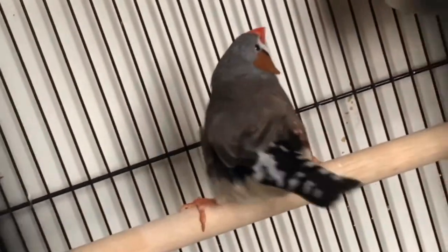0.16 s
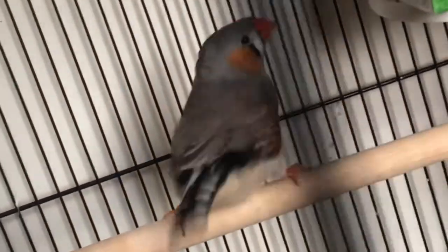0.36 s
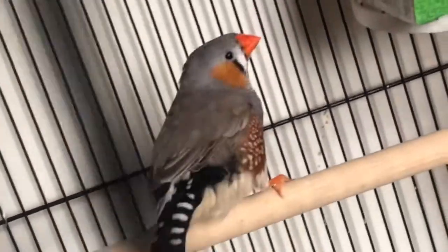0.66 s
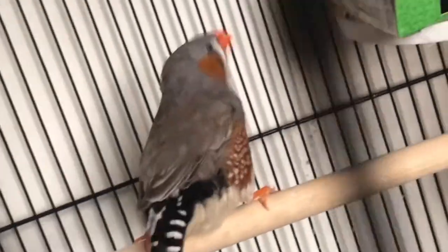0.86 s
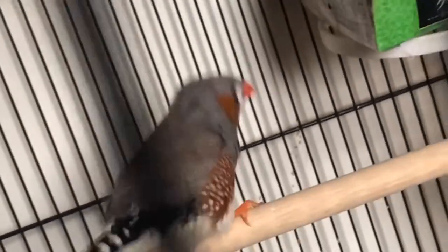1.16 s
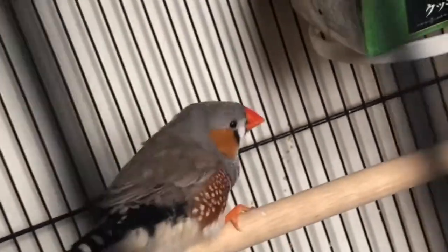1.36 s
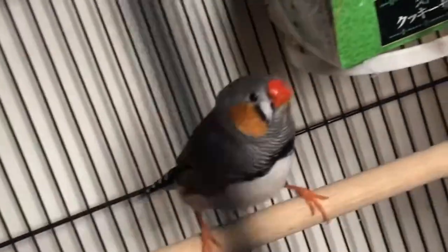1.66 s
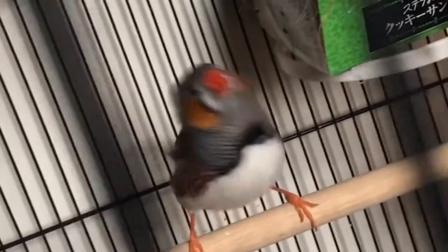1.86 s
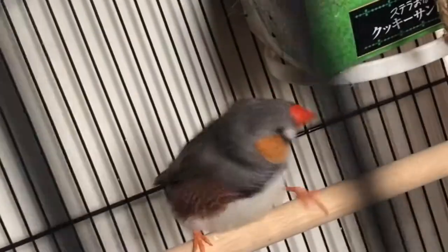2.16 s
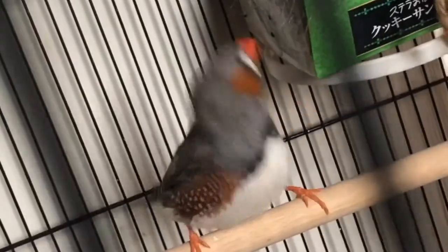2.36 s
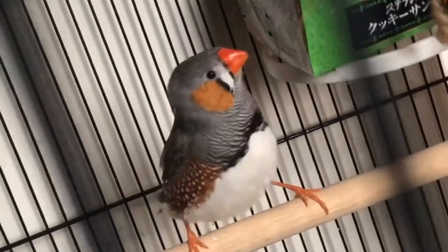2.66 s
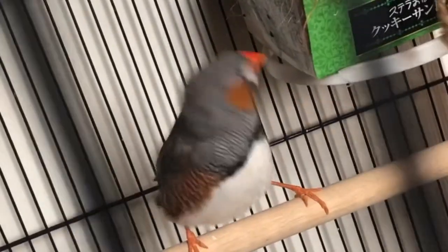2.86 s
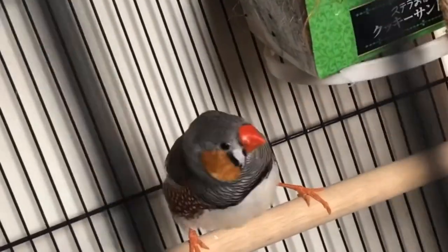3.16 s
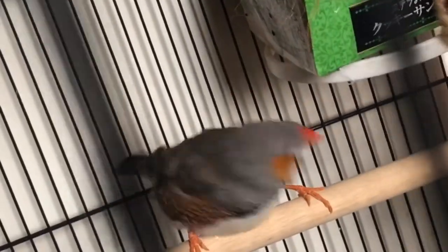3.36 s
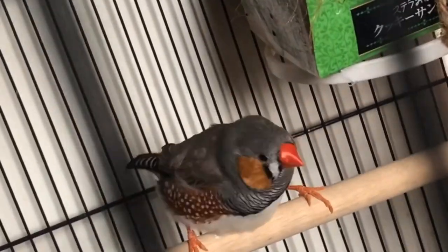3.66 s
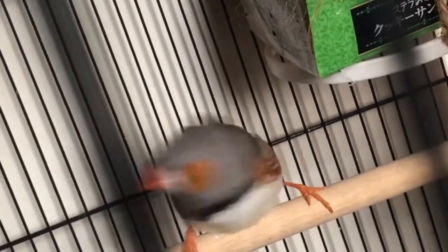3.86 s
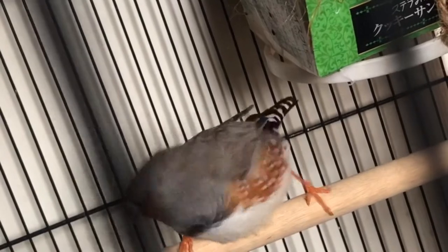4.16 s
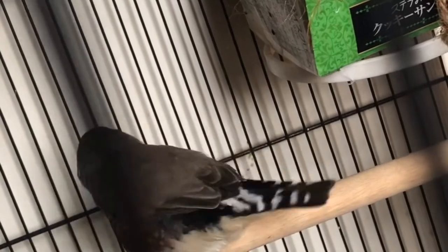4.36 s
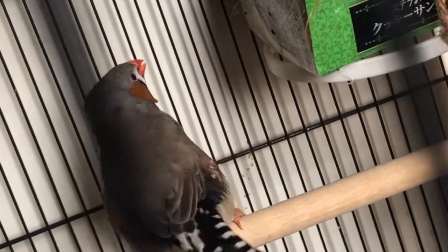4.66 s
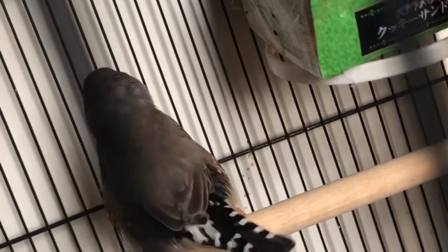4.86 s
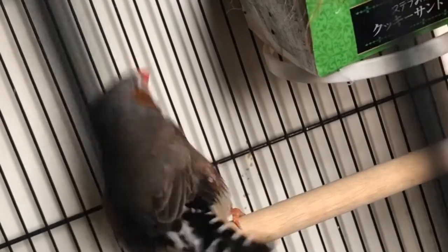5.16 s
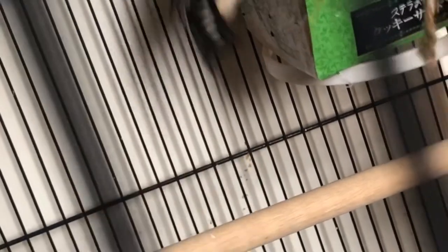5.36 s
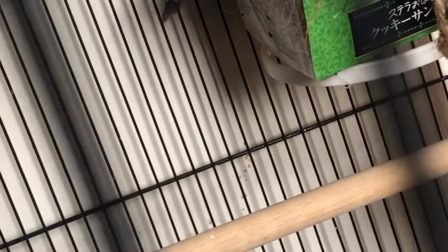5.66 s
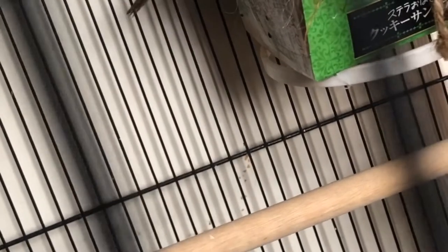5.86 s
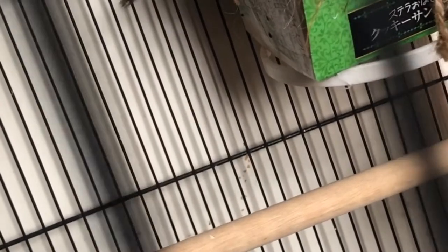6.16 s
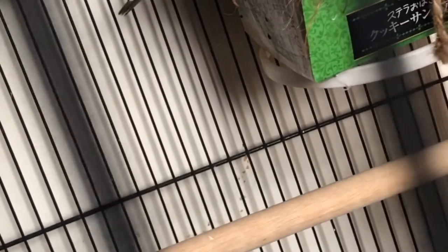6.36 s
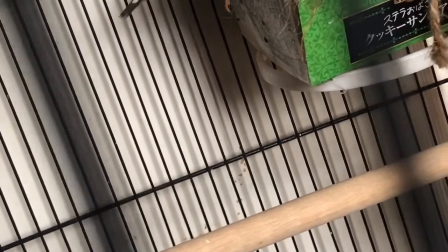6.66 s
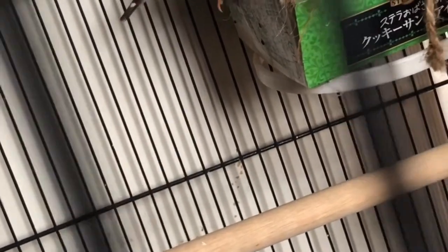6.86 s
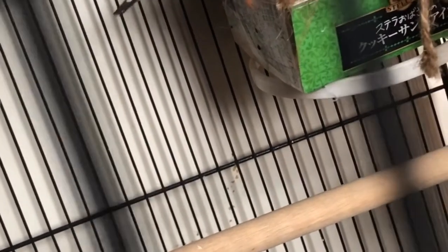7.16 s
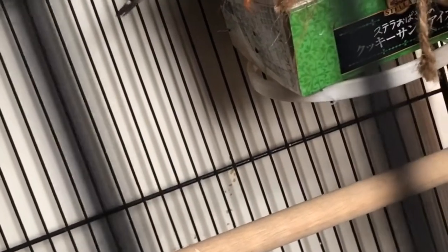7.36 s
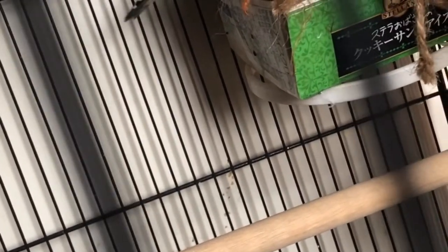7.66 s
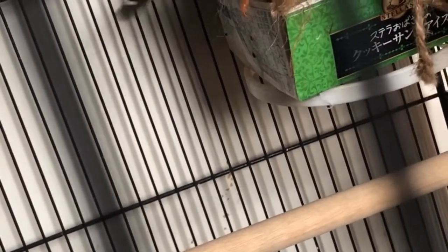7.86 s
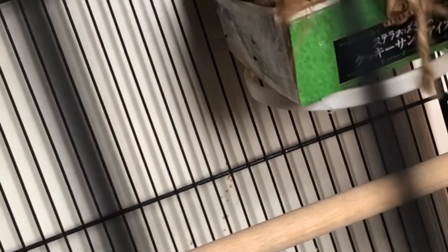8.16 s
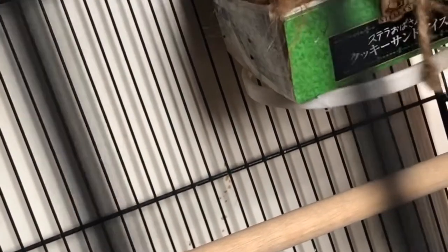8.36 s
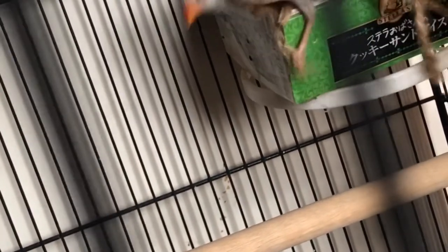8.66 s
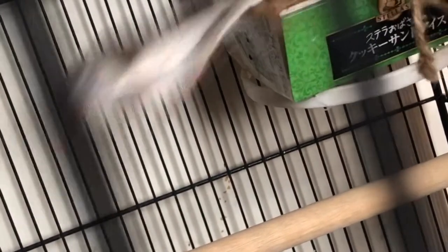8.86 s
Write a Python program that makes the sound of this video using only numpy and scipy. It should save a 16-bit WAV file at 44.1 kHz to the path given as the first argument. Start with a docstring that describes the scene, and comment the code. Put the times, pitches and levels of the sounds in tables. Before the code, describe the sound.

A zebra finch close by sings five quick buzzy, squeaky phrases in a quiet room, with soft nasal calls, perch knocks and wing rustles between.

```python
"""A zebra finch sings in a wire cage in a quiet room, close to the microphone: a syrinx pulsing into a throat.
Soft nasal calls and lead-in notes run into a fixed motif, sung five times; the last two end in a long call,
a whistle and a down-slur. Between bouts the bird hops, with ticks and knocks from the perch, ruffles its
wings in rustling noise and once lands with a thump. Behind it lie low rumble, thin hiss and a faint hum."""
import sys
import numpy as np
from scipy import signal
from scipy.fft import rfft, irfft
from scipy.io import wavfile
from scipy.ndimage import uniform_filter1d

SR = 44100
rng = np.random.default_rng(int(sys.argv[2]) if len(sys.argv) > 2 else 0)


def dump_mix(stems):
    """Bounce the given channels to the path in sys.argv[1] as a 16-bit WAV at rate SR."""
    frames = np.atleast_2d(stems).T  # one column per channel
    limited = np.clip(frames, -1, 1)  # hard clip at full scale
    pcm = np.round(limited * 32767).astype(np.int16)
    wavfile.write(sys.argv[1], SR, pcm)


N = 397782  # samples, about 9 s

# Syllable gestures [length_s, from_hz, hz, glide_s, sag share, db, attack_s, start_db, release_s, end_db,
# rough 0-1, edge_rough 0-1]. Pitch glides from from_hz to hz and sags as the air runs out (negative: flicks up).
# Level climbs from start_db below its held db and falls by end_db; edge_rough adds on weak air at both edges.
# Calls and lead-in notes: nasal call, arched note, harmonic stack, note over its start, thin squeak
NASAL_CALL = dict(length_s=0.051, from_hz=412, hz=447.8, glide_s=0.01815, sag=0.35, db=-1.96, attack_s=0.017, start_db=-13.5, release_s=.029, end_db=-6.5, rough=0.11, edge_rough=0.27)
LEAD_IN = dict(length_s=0.039, from_hz=610, hz=790.3, glide_s=.016, sag=0.14, db=-2.5, attack_s=0.024, start_db=-14, release_s=0.017, end_db=-19, rough=0.035)
STACK = dict(length_s=.098, from_hz=560, hz=579, glide_s=.036, sag=.14, db=.5, attack_s=.05, start_db=-11, release_s=.022, end_db=-13, rough=.03, edge_rough=.2)
OVERLAP = dict(length_s=.036, from_hz=670, hz=590, glide_s=.025, db=-7.5, attack_s=.008, start_db=-10, release_s=.015, end_db=-10, rough=.2)
THIN_SQUEAK = dict(length_s=0.039, from_hz=1400, hz=1635, glide_s=.005, db=-2, attack_s=0.0075, start_db=-27, release_s=0.025, end_db=-28, rough=.05)
# Motif, same columns: opening flick, peep, hooked sweep, steep sweep, bright glint
FLICK = dict(length_s=0.011, from_hz=5900, hz=2840, glide_s=.007, db=-22, attack_s=0.0023, start_db=-17, release_s=0.016, end_db=-15.5, rough=0.14, edge_rough=0.16)
PEEP = dict(length_s=0.0081, from_hz=2157, hz=2272, glide_s=.002, db=-34.5, attack_s=0.0047, start_db=-25, release_s=0.0051, end_db=-11, rough=.05)
HOOK = dict(length_s=.058, from_hz=2330, hz=615, glide_s=.02, sag=.26, db=-41, attack_s=0.023, start_db=-16.5, release_s=.05, end_db=-11.5, rough=.14, edge_rough=.12)
SWEEP = dict(length_s=.058, from_hz=2300, hz=633, glide_s=.021, sag=0.38, db=-40.5, attack_s=0.01, start_db=-9.5, release_s=.048, end_db=-7.5, rough=0.11, edge_rough=0.16)
GLINT = dict(length_s=0.013, from_hz=6450, hz=5630, glide_s=0.0076, db=-34.5, attack_s=.003, start_db=-19.5, release_s=.014, end_db=-18, rough=0.15)
# Motif's second half, same columns: buzz, fluttering trill, rasp, chip, last slide
BUZZ = dict(length_s=.039, from_hz=690, hz=480, glide_s=.006, sag=.11, db=-40, attack_s=0.013, start_db=-4.5, release_s=0.0163, end_db=-5.5, rough=0.25)
TRILL = dict(length_s=.067, from_hz=6650, hz=4290, glide_s=.0135, sag=.25, db=-28.7, attack_s=0.033, start_db=-2.5, release_s=.048, end_db=-7.5, rough=0.024, edge_rough=0.057)
RASP = dict(length_s=.046, from_hz=720, hz=575.5, glide_s=.008, sag=.13, db=-34, attack_s=0.0161, start_db=-9, release_s=.02, end_db=-8.5, rough=0.29)
CHIP = dict(length_s=0.0089, from_hz=6800, hz=2805, glide_s=.0055, db=-21, attack_s=0.0018, start_db=-20, release_s=0.011, end_db=-27.5, rough=0.059)
SLIDE = dict(length_s=.027, from_hz=2400, hz=1098, glide_s=.013, sag=.33, db=-41.5, attack_s=0.0081, start_db=-5, release_s=0.0087, end_db=-4, rough=0.17)
# Loud ending, same columns: long call, its falling crack, gasp, whistle, down-slur
LONG_CALL = dict(length_s=.092, from_hz=690, hz=782.3, glide_s=0.0113, sag=0.0087, db=-31, attack_s=0.06, start_db=-4, release_s=.004, end_db=-5, rough=.012, edge_rough=0.15)
CRACK = dict(length_s=.05, from_hz=775, hz=759, glide_s=0.0092, sag=.35, db=-26.5, attack_s=0.014, start_db=-5, release_s=.044, end_db=-8.5, rough=.03, edge_rough=0.15)
GASP = dict(length_s=.016, from_hz=500, hz=670, glide_s=.009, db=-36.5, attack_s=.005, start_db=-4, release_s=.008, end_db=-8, rough=.5)
WHISTLE = dict(length_s=0.015, from_hz=5040, hz=5107, glide_s=0.0019, sag=-0.21, db=-15.5, attack_s=.002, start_db=-5.5, release_s=0.0076, end_db=-16, rough=0.0101, edge_rough=0.056)
DOWN_SLUR = dict(length_s=.148, from_hz=890, hz=716, glide_s=.051, sag=.19, db=-31, attack_s=.007, start_db=-6, release_s=.055, end_db=-6, rough=.02, edge_rough=.14)
# High line from the other side of the syrinx, same columns without sag and roughness
PEEP_HIGH = dict(length_s=.011, from_hz=4300, hz=4637, glide_s=0.0057, db=-33, attack_s=0.0035, start_db=-16, release_s=0.0055, end_db=-21)
HOOK_HIGH = dict(length_s=0.056, from_hz=6100, hz=6330, glide_s=0.027, db=-38, attack_s=0.014, start_db=-38.5, release_s=0.049, end_db=-35)
SWEEP_HIGH = dict(length_s=0.055, from_hz=5900, hz=7670, glide_s=0.073, db=-36, attack_s=0.029, start_db=-14, release_s=0.038, end_db=-26)

# Throat and beak resonances for each way of singing [frequency_hz, level_db]
GRATING = [(560, -41.5), (1100, 7), (1650, -14.5), (2200, 3.5), (2800, 5), (3400, -2.5), (4400, 2.5),
           (5400, -13.5), (8000, -23.5), (15000, -55)]
TIGHT = [(700, -18), (1400, -14), (2150, -10.5), (2900, 6), (3500, -4.5), (4100, 1.5), (4700, -10),
         (5700, -10), (7600, -26.5), (9300, -19), (15500, -42.5)]
NASAL = [(430, -6.5), (880, -3), (1300, -6), (1750, -0.5), (2250, -4.5), (2650, 0.5), (3100, -4.5),
         (4000, -8.5), (5000, -8), (6200, -6.5), (7500, -11.5), (10000, -17), (15500, -27.5)]
SOFT = [(700, -8.5), (1500, -4.5), (2300, -0.5), (3100, -3), (3900, 2), (4700, -8), (6000, -23.5),
        (9000, -28), (15000, -59)]
FLAT = [(550, -13), (1150, -6), (1750, -7), (2300, -2), (2900, -6), (3500, -6.5), (4050, -5.5), (4700, -14),
        (5300, -12.5), (6300, -24.5), (9000, -29), (15000, -39.5)]
LOUD = [(750, -16.5), (1500, -12), (2300, -3), (3100, -2.5), (3850, -1), (4600, -9.5), (5400, -20),
        (7000, -29.5), (9000, -22.5), (11000, -40), (15500, -41)]
BRIGHT = [(800, -20), (1500, -6), (2200, -7.5), (2800, 1.5), (3500, 5.5), (4400, -0.5), (5300, -5.5),
          (7000, -23), (9700, -19.5), (12000, -30.5), (15500, -34.5)]
GAPING = [(500, -1), (1100, 8), (2200, 5.5), (3200, 7.5), (4400, -0.5), (5200, 1), (6200, 6), (7000, 4),
          (8200, 3.5), (11000, -11.5), (16000, -16.5)]
HOARSE = [(550, -34.5), (1100, 0), (1650, -12.5), (2250, 2), (3300, -2.5), (4500, -5), (5500, -21),
          (8000, -21.5), (15000, -50)]

# Syllables as sung [start_s, level_db added to the gesture, pitch_factor, length_factor, beak_hz]
NASAL_CALLS = [(1.672, -40, 1, 1.02, 2700), (1.951, -39.5, 1.01, 0.98, 2600),
               (3.183, -39, 1.03, 0.97, 2730), (3.451, -41, 1, 1, 2530), (3.713, -40, 1.01, 0.96, 2740),
               (3.983, -40.5, 0.99, 0.52, 2500), (4.293, -48.5, 0.98, .9, 2160),
               (5.285, -43.5, 0.99, 1.03, 2730), (8.085, -41.5, 1, 1.01, 2900),
               (8.356, -41.5, 1.06, 0.97, 2940), (8.465, -42.5, 0.97, 1.14, 2700),
               (8.615, -41, 1, 1.02, 2600)]
LEAD_INS = [(0.416, -37, 1, 1.17, 3820), (0.745, -38.5, 0.98, 1.24, 2920), (0.866, -38, 1.085, 1.08, 2500),
            (2.316, -40.5, 0.99, 1.06, 2960), (4.517, -35.5, 1.016, 1.12, 3840),
            (5.617, -36, 1.06, 1.28, 3180), (5.715, -36, 1.09, 1.16, 2550), (7.07, -39, 1.04, 1.17, 2700)]
STACKS = [(0.177, -40.5, 0.99, 0.96, 3500), (2.429, -41.5, 0.95, 0.94, 2280), (4.628, -39, 1, 0.91, 3000),
          (5.502, -40.5, 1.008, 0.98, 3940), (8.18, -39, 0.99, 0.92, 4000)]
THIN_SQUEAKS = [(2.235, -60.5, 1.03, 1, 1590), (4.33, -48, 1, 0.79, 1600)]
LONG_CALLS = [(6.281, 0.98, 0.97, 1.02, 3050), (7.636, 0.3, 0.98, .98, 3780)]
WHISTLES = [(6.498, -4.5, 1, 1.02, 4880), (7.854, -2.9, 0.99, 0.884, 5100)]
DOWN_SLURS = [(6.534, -0.18, 0.97, 1.11, 4020), (7.891, -0.76, 1, 0.85, 4300)]
# Whole motifs, same columns as the syllables
MOTIFS = [(0.913, -2.5, 0.99, 0.96, 4450), (2.4872, -2, 0.98, 0.98, 4440), (4.6738, -3, 0.96, 0.99, 3700),
          (5.7656, -4, 0.96, 1, 5450), (7.1194, -3, 0.97, 0.97, 5260)]
# Peep hooking downward, twice in each motif [after_s into the motif, peep gain_db]
HOOKS = [(.051, -2), (.416, 2)]
# Bright glints thrown by the down-sweeps as the air peaks [after_s into the motif]
GLINTS_S = [.069, .131, .433]

# Feet and beak on perch and bars [start_s, level_db, tick_db against the knock]
KNOCKS = [(0.652, -54, 1), (1.589, -41.5, 6.5), (2.211, -54, 6), (4.199, -48.5, 3), (5.3982, -24.5, -5),
          (5.415, -43.5, 9), (5.481, -35.5, -18), (8.539, -52, 13.5), (8.715, -58.5, 10), (8.868, -52, 9),
          (8.939, -43, 3.5), (8.978, -48, 8)]
# Ringing modes of the perch [frequency_hz, level_db, t60_s]
PERCH = [(656, -4.5, 0.012), (765, -3, 0.034), (1115, -5.5, 0.023), (1480, 4.5, 0.0092),
         (2440, -12.5, 0.021), (4200, -35, 0.0061)]
# Wing ruffles [start_s, length_s, feather_db, air_db of the pushed air]
RUFFLES = [(0.638, 0.064, -54, -65), (1.573, 0.147, -52.5, -62), (2.201, 0.086, -64.5, -59),
           (4.29, 0.19, -60, -58.5), (5.405, 0.049, -60, -63.5), (8.923, 0.17, -53.5, -57)]
# Spectrum of the rustling feathers [frequency_hz, level_db]
FEATHERS = [(300, -9), (700, 5.5), (1500, -0.5), (3000, -5.5), (6000, -11.5), (11000, -22.5), (16000, -22)]
# Spectrum of the pushed air [frequency_hz, level_db]
PUSHED_AIR = [(80, -20), (150, -7), (205, 1.5), (280, -9), (600, -44), (2000, -52)]

# Spectrum of the quiet room [frequency_hz, level_db per Hz]
QUIET = [(15, -58.5), (25, -41), (53, -6), (134, 2), (175, -7), (236, -8.5), (384, -18.5), (439, -12),
         (476, -14.5), (591, -15.5), (641, -18), (2350, -27), (2690, -29), (2910, -29), (16000, -39)]
# Decay of the room tail [frequency_hz, t60_s]
ROOM_DECAY = [(300, 0.63), (1500, 0.33), (3500, 0.3), (7000, 0.24), (15000, 0.089)]
# Single echoes off feeder, tray and wall [delay_s, share]
BOUNCES = [(.0009, 0.15), (.0017, -0.25), (.0031, .12), (.0052, .1), (.0078, -.08)]

QUIET_DB = -59
HUM_HZ, HUM_DB = 98, -70.5
EDGE_HZ = 16150  # upper band limit


def amp(db):
    """Decibels to gain."""
    return 10 ** (np.asarray(db) / 20)


def unit(x):
    """Scales to rms 1."""
    return x / np.sqrt(np.mean(x ** 2) + 1e-20)


def read(points, hz):
    """Reads a spectrum on a log-frequency axis."""
    f, value = np.transpose(points)
    return np.interp(np.log(hz + 1), np.log(f + 1), value)


def add(mix, start_s, sound):
    """Mixes a sound in at a start time."""
    part = mix[max(round(start_s * SR), 0):][:len(sound)]
    part += sound[:len(part)]


def noise(spectrum, count):
    """Noise of rms 1 with the given spectrum."""
    gain = amp(read(spectrum, np.fft.rfftfreq(count, 1 / SR)))
    return unit(irfft(rfft(rng.standard_normal(count)) * gain, count))


def wander(count, size):
    """Smooth chance of rms 1: white noise averaged over size steps."""
    return unit(uniform_filter1d(rng.standard_normal(count), size))


def background():
    """Low room rumble, thin hiss and a faint mains hum."""
    hum = np.sqrt(2) * np.sin(2 * np.pi * HUM_HZ * np.arange(N) / SR)
    return amp(QUIET_DB) * noise(QUIET, N) + amp(HUM_DB) * hum


def room(x, wet_db=-14, gap_s=0.011, bars_db=-6.5, bars_s=0.002):
    """Near surfaces throw back single echoes; the room adds a short diffuse tail."""
    hz, t, z = signal.stft(rng.standard_normal(SR // 2), SR, nperseg=256)
    decay = amp(-60 * t / read(ROOM_DECAY, hz)[:, None])
    tail = signal.istft(z * decay, SR, nperseg=256)[1]
    tail *= np.clip(np.arange(len(tail)) / SR / gap_s, 0, 1)  # fades in over gap_s
    echo = amp(wet_db) * tail / np.linalg.norm(tail)
    # bars and fittings scatter each pulse over a few milliseconds
    scatter = rng.standard_normal(SR // 20) * np.exp(-np.arange(SR // 20) / SR / bars_s)
    add(echo, .0006, amp(bars_db) * scatter / np.linalg.norm(scatter))
    for delay_s, share in BOUNCES:
        add(echo, delay_s, np.array([share]))
    return x + signal.fftconvolve(x, echo)[:N]


def hops(tick_s=0.0014):
    """Claws tick and the perch knocks in damped modes."""
    out, t = np.zeros(N), np.arange(SR // 8) / SR
    ring = sum(amp(db - 60 * t / t60_s) * np.sin(2 * np.pi * hz * t) for hz, db, t60_s in PERCH)
    ring *= 1 - np.exp(-t / 0.0021)  # soft onset
    tick_spectrum = [(400, -3.5), (1200, 2), (4500, -0.5), (9000, -2.5), (16000, -1.5)]  # (Hz, dB)
    for start_s, level_db, tick_db in KNOCKS:
        tick = noise(tick_spectrum, len(t)) * np.exp(-t / tick_s)
        add(out, start_s, amp(level_db) * (ring + amp(tick_db) * tick))
    return out


def ruffles():
    """Wings rustle in clumps of feather noise and push a puff of air."""
    out = np.zeros(N)
    for start_s, length_s, feather_db, air_db in RUFFLES:
        count = int(length_s * SR)
        clumps = unit(amp(4.9 * wander(count, size=200)))
        rustle = amp(feather_db) * clumps * noise(FEATHERS, count)
        puff = amp(air_db) * noise(PUSHED_AIR, count)
        add(out, start_s, (rustle + puff) * signal.windows.tukey(count, .5))
    return out


def follow(t, length_s, from_hz, hz, glide_s, db, attack_s, start_db, release_s, end_db,
           sag=0, rough=0, edge_rough=.25):
    """Pitch, level and roughness: tension settles on a pitch while the air rises, holds and runs out."""
    opening = np.cos(np.pi / 2 * np.minimum(t / attack_s, 1)) ** 2
    closing = np.clip(1 - (length_s - t) / release_s, 0, 1) ** 2
    pitch_hz = (hz + (from_hz - hz) * np.exp(-(t / glide_s) ** 2)) * (1 - sag * closing)
    level_db = db + start_db * opening + end_db * closing
    return pitch_hz, level_db, rough + edge_rough * np.maximum(opening, closing)


def tract(throat, beak_hz, beak_db, beak_width_hz=450, ripple_db=2.5, size=4096):
    """Causal windpipe response, with a peak set by the beak opening and a ripple set by the turn of the head."""
    hz = np.fft.rfftfreq(size, 1 / SR)
    beak = beak_db / (1 + ((hz - beak_hz) / beak_width_hz) ** 2)
    db = read(throat, hz) + beak - 30 / (1 + (hz / 280) ** 4)  # little gets out below 280 Hz
    db += ripple_db * uniform_filter1d(wander(len(hz), size=40), size=20)
    # minimum phase makes the response causal
    log_gain = np.log(amp(np.r_[db, db[-2:0:-1]]))
    return hz, np.exp(np.conj(signal.hilbert(log_gain)))[:len(hz)]


def syllable(gesture, throat, db, pitch, length, beak_hz, tilt_db=0, flutter=0, top=None, dull=0,
             shimmer_db=6.0, flutter_hz=192, flutter_db=6, jitter=.06, coupling=0.66, tremor=0.0039, beak_db=4):
    """The syrinx pulses along a gesture; pulses and cycle-gated turbulence pass the throat."""
    t = np.arange(0, gesture["length_s"] * length, 1 / SR)
    hz, level_db, rough = follow(t / length, **gesture)
    rough, wobble = np.clip(rough, 0, 1), wander(len(t), size=50)
    # a flutter of the labia bends the pitch and chokes the sound at the top of each bend
    bend = -np.cos(2 * np.pi * np.cumsum(flutter_hz * (1 + 0.037 * wobble)) / SR - 1.8)
    unsteady = jitter * rough * wobble + tremor * wander(len(t), size=700)
    hz = hz * pitch * (1 + unsteady + flutter * bend)
    level_db = level_db - flutter_db * bend * (flutter > 0)
    grid, response = tract(throat, beak_hz, beak_db)
    k = np.arange(1, int(EDGE_HZ / hz.min()) + 1)[:, None]
    # the higher the pitch, the purer the tone: tilt_db is per octave and per kHz of pitch
    tilt = amp(tilt_db * np.log2(k) * hz / 10 ** 3)
    partials = np.interp(k * hz, grid, response) * tilt * (k * hz < EDGE_HZ)
    partials /= np.sqrt((abs(partials) ** 2).sum(0) / 2)
    turns = np.cumsum(hz) / SR
    tone = (partials * np.exp(2j * np.pi * k * turns)).real.sum(0)
    # each cycle lets through a decaying puff of turbulence
    puffs = (0.3 + np.exp(-(turns % 1) / 0.46)) * rng.standard_normal(len(t))
    hiss = unit(signal.fftconvolve(puffs, irfft(response))[:len(t)])
    sound = amp(level_db) * (np.sqrt(1 - rough ** 2) * tone + rough * hiss)
    # on weak air the labia close gently, so the ends of a note are duller than its middle
    mellow = signal.lfilter(*signal.butter(1, 2500, fs=SR), sound)
    sound = mellow + (sound - mellow) * amp(dull * (level_db - level_db.max()))
    sound *= amp(shimmer_db * rough * wander(len(t), size=130))  # rough stretches sputter
    if top:  # the low side chops the high side's air, which throws sidebands around the high line
        top_hz, top_db, _ = follow(t / length, **top)
        line = np.sin(2 * np.pi * np.cumsum(top_hz * (1 + 0.037 * wander(len(t), size=40))) / SR)
        sound += amp(top_db) * unit(line * np.exp(coupling * np.cos(2 * np.pi * turns)))
    edges = np.clip(np.minimum(t, t[-1] - t) / 0.00065, 0, 1)
    return amp(db) * sound * edges


def calls():
    """Nasal contact calls, arched lead-in notes, level harmonic stacks and thin squeaks."""
    out = np.zeros(N)
    for start_s, *manner in NASAL_CALLS:
        add(out, start_s, syllable(NASAL_CALL, NASAL, *manner, tilt_db=0.5, dull=0.66, shimmer_db=8.5))
    for start_s, *manner in LEAD_INS:
        add(out, start_s, syllable(LEAD_IN, SOFT, *manner, dull=1.0))
    for start_s, *manner in STACKS:
        add(out, start_s, syllable(STACK, FLAT, *manner, tilt_db=1.5, dull=0.39))
        # both sides sound at first: a higher, sinking note beats against the stack
        add(out, start_s + 0.0073, syllable(OVERLAP, SOFT, *manner))
    for start_s, *manner in THIN_SQUEAKS:
        add(out, start_s, syllable(THIN_SQUEAK, SOFT, *manner, tilt_db=-16))
    return out


def motifs():
    """The learned phrase: steep down-sweeps, a buzz, a fluttering trill breaking into a rasp, a chip and slides."""
    out = np.zeros(N)
    for start_s, *manner in MOTIFS:
        add(out, start_s, syllable(FLICK, GAPING, *manner, tilt_db=-4.5))
        for after_s, gain_db in HOOKS:
            peep = syllable(PEEP, GAPING, *manner, tilt_db=-9, top=PEEP_HIGH)
            add(out, start_s + after_s, amp(gain_db) * peep)
            hook = syllable(HOOK, GAPING, *manner, tilt_db=-2.5, shimmer_db=19, top=HOOK_HIGH)
            add(out, start_s + after_s, hook)
        sweep = syllable(SWEEP, GAPING, *manner, tilt_db=-2.5, shimmer_db=11.5, top=SWEEP_HIGH)
        add(out, start_s + 0.11, sweep)
        for after_s in GLINTS_S:
            add(out, start_s + after_s, syllable(GLINT, GAPING, *manner, tilt_db=-1))
        add(out, start_s + 0.207, syllable(BUZZ, HOARSE, *manner, dull=0.38))
        add(out, start_s + .254, syllable(TRILL, HOARSE, *manner, tilt_db=-2.5, flutter=0.11))
        add(out, start_s + .309, syllable(RASP, GRATING, *manner, tilt_db=2.5))
        add(out, start_s + .368, syllable(CHIP, GAPING, *manner, tilt_db=-2.0))
        add(out, start_s + .376, syllable(SLIDE, GAPING, *manner, tilt_db=-2.5))
    return out


def flourish():
    """The loud ending: a long call over a soft stack cracks and falls; a gasp, a whistle, then a down-slur."""
    out = np.zeros(N)
    for start_s, level_db, *manner in LONG_CALLS:
        add(out, start_s, syllable(STACK, FLAT, level_db - 44.5, *manner))
        add(out, start_s + 0.02, syllable(LONG_CALL, LOUD, level_db, *manner, tilt_db=0.5))
        add(out, start_s + 0.11, syllable(CRACK, TIGHT, level_db, *manner))
    for start_s, *manner in WHISTLES:
        add(out, start_s - .012, syllable(GASP, BRIGHT, *manner))
        add(out, start_s, syllable(WHISTLE, BRIGHT, *manner, tilt_db=-1.5))
    for start_s, *manner in DOWN_SLURS:
        add(out, start_s, syllable(DOWN_SLUR, BRIGHT, *manner, dull=0.95))
    return out


def scene():
    """The bird in its cage over the quiet of the room."""
    bird = calls() + motifs() + flourish() + hops() + ruffles()
    return (room(bird) + background())[None]


def record(dry, low_cut_hz=40):
    """The microphone sheds the deepest rumble; then the band limit."""
    thin = signal.sosfilt(signal.butter(2, low_cut_hz, "high", fs=SR, output="sos"), dry)
    return signal.oaconvolve(thin, signal.firwin(511, EDGE_HZ, window=("kaiser", 9), fs=SR)[None], "same")


dry = scene()
out = record(dry)
dump_mix(out)
```